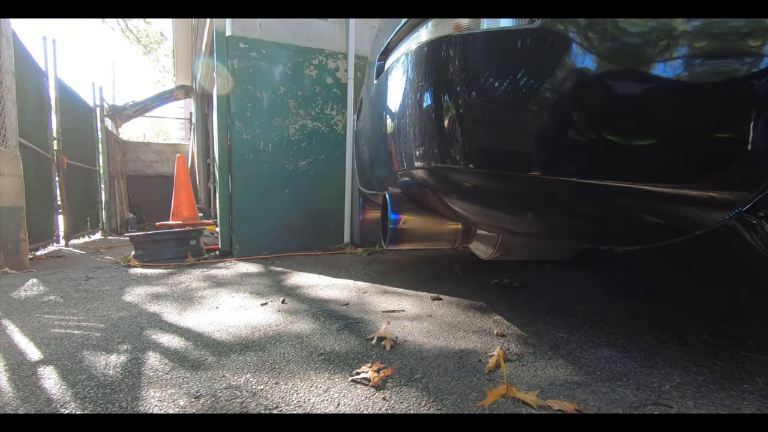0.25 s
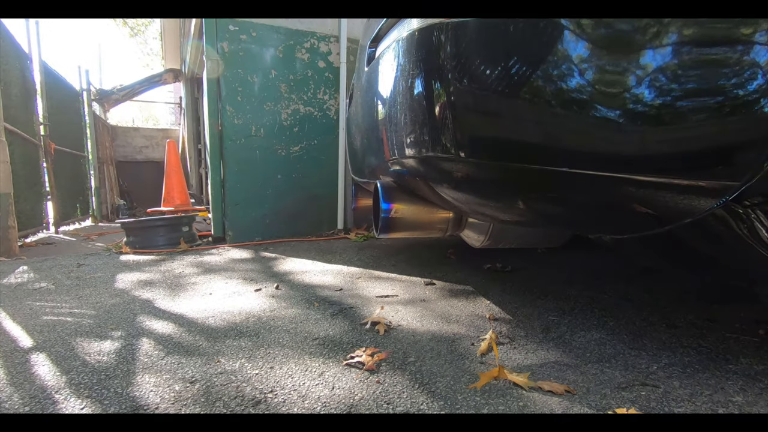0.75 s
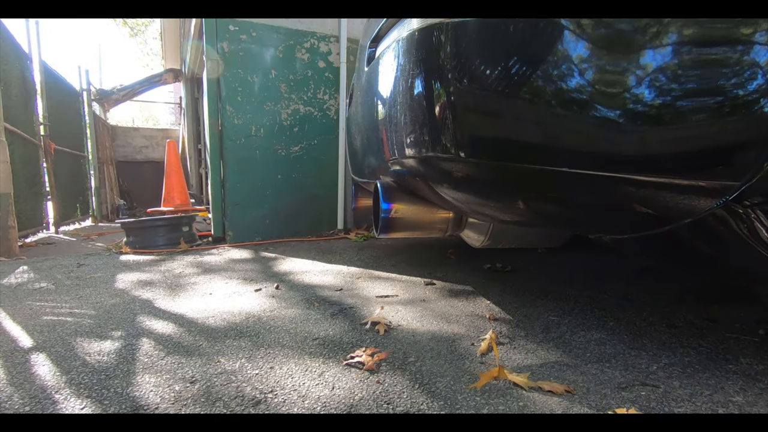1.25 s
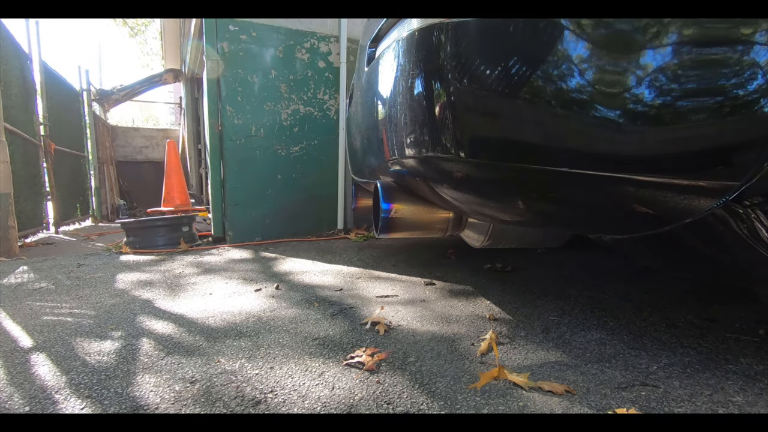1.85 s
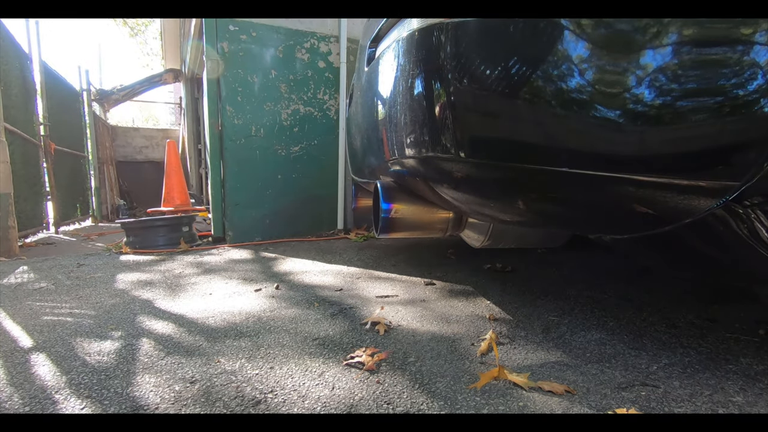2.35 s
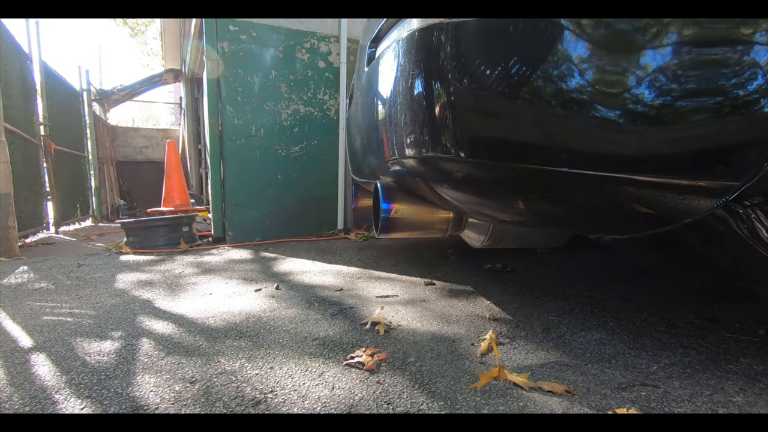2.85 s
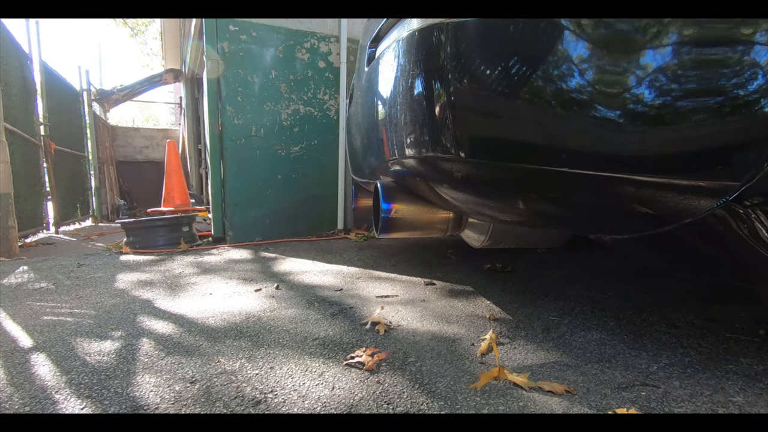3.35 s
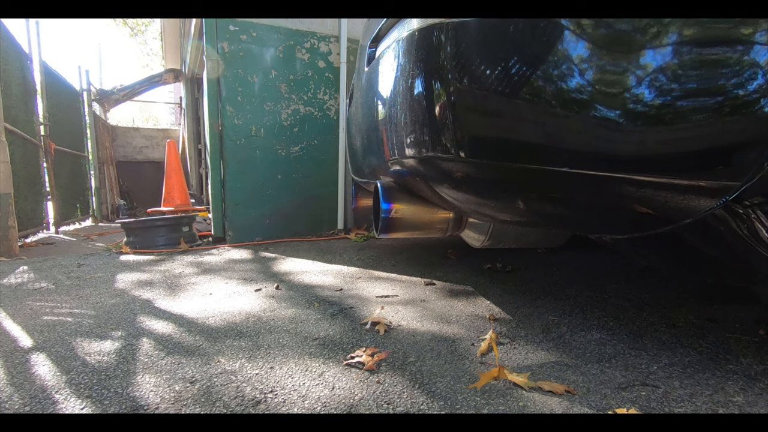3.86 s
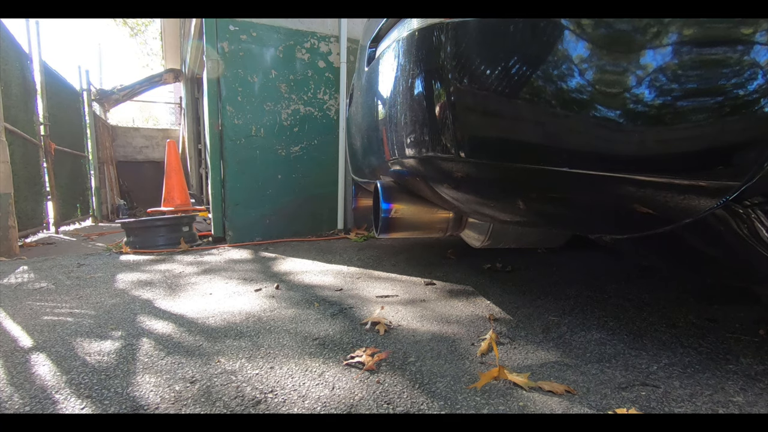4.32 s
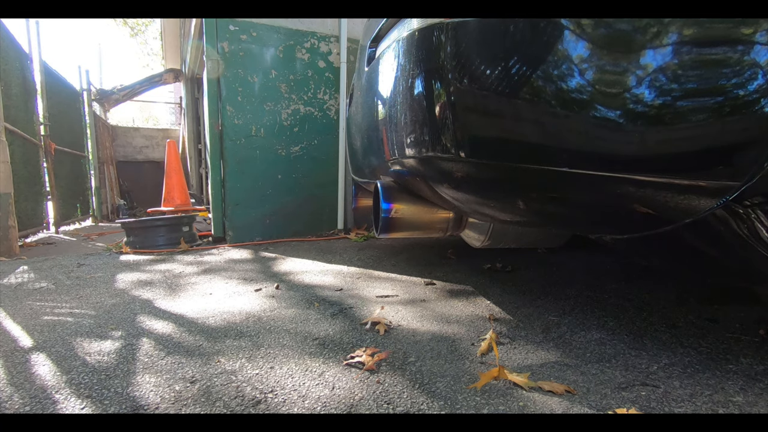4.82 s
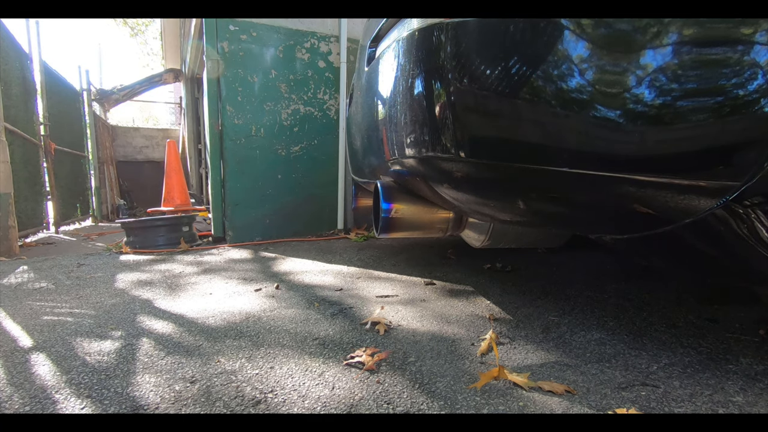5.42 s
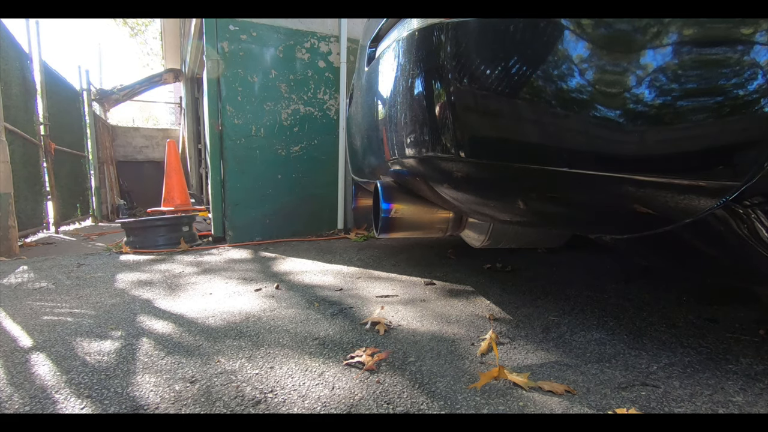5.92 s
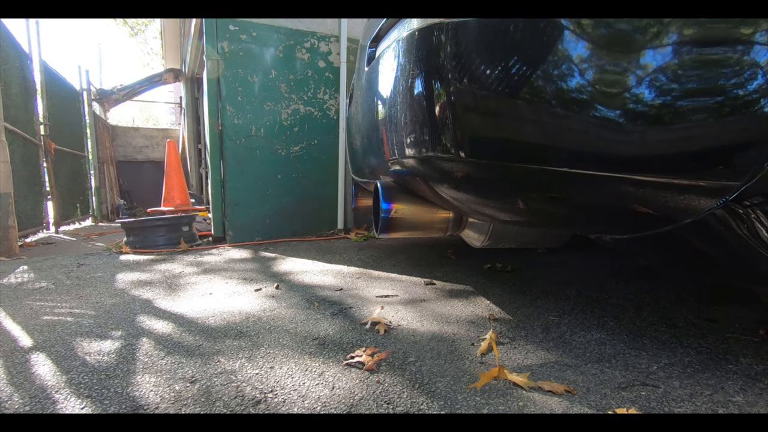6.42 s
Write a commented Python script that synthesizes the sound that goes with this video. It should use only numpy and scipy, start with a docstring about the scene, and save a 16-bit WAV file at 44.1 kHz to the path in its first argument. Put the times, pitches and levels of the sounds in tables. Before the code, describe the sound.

For the first two and a half seconds there is only a low, wavering outdoor rumble and a soft hush, which widens into a stereo hiss with a faint tick at about 0.8 seconds. At 2.5 seconds a car's starter clacks in and grinds through a few compressions, with metallic knocks and low puffs of air from the tailpipe. At about 3.3 seconds the cold V8 catches and flares in a short, loud burst with rough barks and a bright rasp. By 4 seconds it settles into a loud, deep, lumpy idle, heard from the ground near the exhaust. Gas hisses in pulses, the engine bay whirs faintly, and a dry mechanical rasp swells and fades around 4.5 seconds. Very short, rough, rising notes dot the idle, which continues until the end at about 6.6 seconds.

```python
"""A low rumble in a fenced yard; background hush turns to hiss as the recorder opens from mono to stereo.
A starter clacks in and grinds through a few compressions; the cold V8 catches and flares.
It settles into a lumpy idle, heard from the ground near the tailpipe: uneven firings ring the exhaust,
gas hisses and the engine bay whirs once a cycle. Short, rough, rising notes sound over the idle."""
import sys
import numpy as np
from scipy import signal
from scipy.fft import rfft, irfft, next_fast_len
from scipy.io import wavfile
from scipy.ndimage import uniform_filter1d

SR = 44100
rng = np.random.default_rng(int(sys.argv[2]) if len(sys.argv) > 2 else 0)


def file_out(sig):
    """Save sig as 16-bit WAV at sys.argv[1]."""
    # one column per channel
    cols = np.atleast_2d(sig).T
    # limit, then scale
    lim = np.clip(cols, -1, 1)
    pcm = np.round(lim * 32767).astype(np.int16)
    wavfile.write(sys.argv[1], SR, pcm)


N = 294588
TIME = np.arange(N) / SR
FFT_SIZE = next_fast_len(N + SR)
FREQ_HZ = np.maximum(np.arange(FFT_SIZE // 2 + 1) * SR / FFT_SIZE, 1e-3)
COMMON = np.array([[1], [0], [0]])  # selects the row of noise() that both channels share

# noise spectra: (frequency [Hz], gain [dB])
RUMBLE_SPECTRUM = [(15, -30), (30, -8), (48, -15.5), (59, 4.5), (70, -2), (115, -3.5), (150, -8.5),
                   (220, -16.5), (400, -22.5), (900, -57), (6000, -110)]
HUSH_SPECTRUM = [(150, -14), (250, -1.5), (378, -14), (770, -9.5), (1200, -13), (1640, -15), (3010, -29.5),
                 (4480, -26.5), (8600, -52.5), (11200, -94), (18900, -120)]
HISS_SPECTRUM = [(210, -21), (400, -9.5), (700, -5.5), (1120, -3), (1630, -5.5), (3370, -17.5), (4770, -28),
                 (6320, -25.5), (7620, -34.5), (8600, -45.5), (11000, -53), (13000, -67), (16000, -79)]
GRIND_SPECTRUM = [(120, -20), (220, 10.5), (400, -2.5), (700, 3), (1200, 3.5), (2000, 1.5), (2500, 0.5),
                  (3400, -4), (4000, -25), (5000, -15.5), (6400, -6), (7700, -21.5), (8500, -33),
                  (15000, -50)]
GAS_SPECTRUM = [(300, 9.5), (600, -2), (1000, -1), (1700, 1), (2100, -1), (2800, -1.5), (3600, -7.5),
                (4100, -14.5), (4900, -13), (6400, -5.5), (7600, -13.5), (8200, -22), (11000, -25),
                (15000, -43)]
# engine bay stereo balance: (frequency [Hz], left minus right [dB])
BAY_PAN = [(200, -1.5), (500, -6), (950, -7.5), (1600, -7), (2750, -6), (4700, -2.5), (8000, 0)]
# starter load at each compression:
# (time [s], rise [s], length [s], relative grind [dB], gear mesh [Hz], relative hum [dB])
STARTER_STROKES = [(2.483, 0.012, 0.076, -34, 247, -45), (2.542, 0.01, .15, -36.5, 186.7, -31),
                   (2.69, 0.05, 0.13, -29, 234, -25.5), (2.916, 0.0024, 0.085, -31, 230, -32),
                   (3.059, 0.014, 0.076, -30, 244, -37.5), (3.203, 0.0025, 0.073, -31.5, 240, -34.5)]
# starter and bell housing modes: (frequency [Hz], width [Hz], gain [dB])
HOUSING_MODES = [(490, 30, -1), (580, 30, -4), (957, 40, -4), (1136, 25, -5), (1302, 45, 2), (1500, 30, -6),
                 (1792, 25, -2), (1850, 22, -2), (1920, 45, 4), (2089, 18, -3), (2312, 30, -4),
                 (2733, 25, -5), (2942, 18, -5), (3220, 35, -7), (3490, 35, -9), (4020, 40, -17)]
# gear mesh harmonics: (multiple, relative level [dB])
MESH_HARMONICS = [(4, -12), (5, -11), (8, -7)]
# starter gear clacks: (time [s], relative level [dB])
GEAR_CLACKS = [(2.493, -24.5), (2.525, -22.5), (2.915, -23.5), (3.065, -25.5), (3.206, -23.5)]
# unfired air leaving the tailpipe: (time [s], peak [dB])
AIR_PUFFS = [(2.62, -21), (2.838, -18), (2.996, -14), (3.135, -18.5), (3.272, -12.5)]
# cylinders in firing order: (lag [firing intervals], strength [dB], turbulence [dB], cold offset [dB])
V8_CYLINDERS = [(-.08, -4, 2, 7), (-.12, 2.5, 0, -13), (.02, 0, 2, -1), (.38, -3, -1, -11),
                (-.05, 2.5, -6, -18), (-.17, -16, -1, 0), (-.155, 2, -6, 6), (-.175, 5.3, -9, -5.5)]
# exhaust modes: (frequency [Hz], width [Hz], gain [dB], polarity [+/-1])
PIPE_MODES = [(28, 9, -18, -1), (43.5, 39, -13.7, 1), (63.5, 18, -8.8, -1), (94, 45, -3.5, 1),
              (101, 14.5, .7, -1), (123, 22, -13, -1), (174, 16, -14.3, -1), (227, 20, -21.5, -1),
              (328, 22, -34, -1), (400, 22, -38, -1)]
# upper pipe modes stirred by turbulence: (frequency [Hz], width [Hz], gain [dB])
BURBLE_MODES = [(125, 25, 0), (198, 45, 4), (324, 24, 5.5), (390, 30, 0), (450, 35, -6), (535, 20, -8)]
# brief dips in the exhaust level: (time [s], half length [s], gain [dB])
EXHAUST_DIPS = [(3.6, 0.018, -24), (4.393, 0.0048, -11), (4.522, 0.013, -11.5)]
# barks of hard firings: (time [s], half length [s], level [dB])
EXHAUST_BARKS = [(3.452, 0.012, -21), (3.482, .014, -16), (3.52, 0.025, -30), (3.648, 0.016, -28.5),
                 (5.188, 0.0062, -26.5), (5.555, 0.0076, -29)]
# short rising notes over the idle: (time [s], half length [s], pitch [Hz], level [dB])
RISING_NOTES = [(3.908, .022, 433, -29), (4.636, 0.017, 430, -32.5), (5.091, 0.02, 399, -28),
                (5.384, 0.027, 434, -32.5), (5.461, 0.011, 400, -30), (5.826, 0.016, 434, -29),
                (6.188, 0.013, 412, -29), (6.545, .014, 411, -27)]

STEREO_FROM_S = .782
CATCH_S, FLARE_S, EFFORT_FALL_S = 3.32, 3.49, .15
LOPE_S, SETTLE_S = 3.461, .045  # the uneven idle sets in
WARM_S, WARMING_S = 3.94, .05  # the cold offsets fade
SKIP_S, SKIP_CYCLES = 4.39, .24  # the rhythm jumps ahead once


def undb(db):
    """Decibels to gain."""
    return 10 ** (np.asarray(db) / 20)


def unit(x):
    """Scale to rms 1."""
    return x / np.sqrt(np.mean(x ** 2))


def noise():
    """Wide white noise; rows: common, left only, right only."""
    return rng.standard_normal((3, N))


def walk(rate_hz):
    """Smooth random wander, spread near 1."""
    hold = int(SR / rate_hz)
    steps = np.repeat(rng.standard_normal(N // hold + 1), hold)
    return 1.3 * uniform_filter1d(uniform_filter1d(steps, hold), hold)[:N]


def ramp(start_s, length_s):
    """Linear rise from 0 to 1."""
    return np.clip((TIME - start_s) / length_s, 0, 1)


def bump(centre_s, half_s):
    """Gaussian of height 1."""
    return np.exp(-((TIME - centre_s) / half_s) ** 2)


def swell(start_s, rise_s, length_s, fall_s):
    """Linear rise, hold, exponential fall."""
    return ramp(start_s, rise_s) * np.exp(-np.maximum(TIME - start_s - length_s, 0) / fall_s)


def through(x, response):
    """Filter by a frequency response."""
    return irfft(rfft(x, FFT_SIZE) * response, FFT_SIZE)[..., :N]


def band(response):
    """Filtered wide noise, rms 1."""
    return unit(through(noise(), response))


def colour(points):
    """Response through (frequency [Hz], gain [dB]) points."""
    hz, db = np.transpose(points)
    return undb(np.interp(np.log(FREQ_HZ), np.log(hz), db))


def resonance(hz, width_hz):
    """One mode, gain 1 at its centre."""
    return 1 / (1 + 1j * (FREQ_HZ ** 2 - hz ** 2) / (FREQ_HZ * width_hz))


def modes(table):
    """Sum of (frequency [Hz], width [Hz], gain [dB]) modes."""
    return sum(undb(db) * resonance(hz, width_hz) for hz, width_hz, db in table)


def pan(x, left_db):
    """Place by left minus right level."""
    return x * undb(np.array([[left_db], [-left_db]]) / 2)


def from_bay(x, scatter_db=0, left_lag_s=.0002373):
    """Sound from under the car arrives right first; body and fence scatter it from all sides."""
    direct = through(x[0], np.exp(-2j * np.pi * FREQ_HZ * np.array([[left_lag_s], [0]])))
    # ground to floor pan echoes: a fine comb
    echoes = rng.standard_normal((2, SR // 4)) * np.exp(-TIME[:SR // 4] / .025)
    comb = 1 + undb(-9) * rfft(echoes / np.linalg.norm(echoes, axis=1, keepdims=True), FFT_SIZE)
    balance = colour(BAY_PAN) ** np.array([[.5], [-.5]])
    return through(direct + undb(scatter_db) * x[1:], comb * balance)


def background():
    """Wavering rumble, brief rustle; hush turns to hiss as the recorder opens from mono to stereo."""
    rumble = unit(through(noise()[0], colour(RUMBLE_SPECTRUM)))
    rumble_db = -36 + 7.5 * ramp(.37, .048) + 1.14 * walk(8.86)
    rumble *= undb(rumble_db) * swell(-1, 1, 5.4, .071)
    opened = ramp(STEREO_FROM_S, .005)
    hush = band(colour(HUSH_SPECTRUM)) * undb(-43 + 3.6 * np.minimum(TIME, 1)) * (1 - opened)
    hiss = band(colour(HISS_SPECTRUM)) * undb(-39 + .5 * walk(2.42))
    hiss *= opened * swell(-.61, 1, 3.6, .072)
    rustle = band(resonance(5470, 1800) ** 4) * undb(-58) * swell(.12, .036, .19, .14)
    floor = hush + hiss + rustle
    return pan(rumble, 3.1) + pan(undb(-2) * floor[0] + undb(1) * floor[1:], .37)


def starter(sag_per_s=1.3):
    """The pinion slams in, grinds harder at each compression, then spins free with a thin ring."""
    grind = undb(-35.5) * swell(2.495, .01, .83, .06)
    hum = teeth = whine = 0
    for start_s, rise_s, length_s, grind_db, mesh_hz, hum_db in STARTER_STROKES:
        # teeth bite hardest at load onset; the motor slows as the piston rises
        push = swell(start_s, rise_s, length_s, .013) + .4 * swell(start_s, rise_s, .005, .02)
        sag = np.exp(-sag_per_s * np.clip(TIME - start_s - length_s / 2, -length_s, length_s))
        tooth = np.cumsum(mesh_hz * sag * (1 + .02 * walk(120))) / SR
        mesh_rad = 2 * np.pi * tooth
        impacts = np.diff(np.floor(tooth), prepend=0)
        grind += undb(grind_db - 3.5) * push * (1 + .5 * np.cos(mesh_rad))
        teeth += undb(grind_db) * push * unit(impacts * undb(2 * walk(250)))
        hum += undb(hum_db + 3 + 3.9 * walk(90)) * push * np.sin(mesh_rad)
        whine += push * sum(undb(grind_db + db + 3) * np.sin(k * mesh_rad) for k, db in MESH_HARMONICS)
    scrape = unit(noise() * undb(.78 * walk(250)))
    housing = modes(HOUSING_MODES) * colour([(4200, 2), (8000, -15), (15000, -42)])
    body = colour(GRIND_SPECTRUM) + undb(5) * housing
    body /= np.sqrt(np.mean(abs(body) ** 2))
    metal = through(scrape * grind + teeth * COMMON, body) * undb(-.5)
    slam = band(colour([(1500, 1), (3000, 1.5), (7700, 4.5), (8600, -11), (15000, -29)]))
    slam *= undb(-34) * swell(2.494, .003, .045, .025)
    ring = band(resonance(4070, 90) ** 2) * undb(-52) * swell(3.4, .1, .27, .02)
    pinion = band(colour([(1500, -12), (3000, 5.5), (4700, -9), (6400, -3), (8500, -16), (15000, -36)]))
    pinion *= undb(-40.5) * swell(2.495, .0091, .94, .037)
    return from_bay(metal + slam + ring + pinion + whine * COMMON) + pan(hum, 1)


def clacks():
    """Slack in the starter gears closes with short metal clacks."""
    blows = sum(undb(db) * swell(s, .00074, .0016, fall_s=.035) for s, db in GEAR_CLACKS)
    ring = band(resonance(1330, 560) + undb(-7) * resonance(2000, 1200) ** 2)
    tone = colour([(300, -4.5), (800, -3.5), (4000, -1.5), (8000, -18), (12000, -20)])
    return from_bay(through(ring * blows, tone), scatter_db=-4)


def compressions():
    """Unfired air murmurs in the pipe during cranking and puffs after each compression."""
    pipe = resonance(64, 30) * colour([(100, 1), (400, -24.5), (2000, -80)])
    impulse = np.diff(ramp(0, 1 / SR), prepend=0)
    kicks = sum(undb(db) * (np.arange(N) == int(s * SR)) for s, db in AIR_PUFFS)
    puffs = through(kicks, -pipe) / abs(through(impulse, pipe)).max()
    murmur = unit(through(noise()[0], pipe + .24 * resonance(274, 120) ** 2))
    murmur *= undb(-29.5) * swell(2.52, .033, .66, .03)
    return pan(puffs + murmur, 3.7)


def engine_cycles(stumble_hz=5.35, idle_hz=8.21, hunt_period_s=2.284):
    """Four-stroke cycle count: stumble, climb, misfire sag, overshoot, slow hunting."""
    misfire_hz = .55 * bump(3.598, .04)
    overshoot_hz = .37 * bump(3.78, .15)
    hunt_hz = .133 * np.cos(2 * np.pi * (TIME - 5.855) / hunt_period_s)
    running_hz = idle_hz - misfire_hz + overshoot_hz + hunt_hz
    speed_hz = stumble_hz + ramp(3.416, .101) * (running_hz - stumble_hz)
    cycle = np.cumsum(speed_hz) / SR + SKIP_CYCLES * (TIME > SKIP_S)
    return cycle - np.interp(5.319, TIME, cycle)  # zero marks the first cylinder


def firings(cycle, strength_db, scatter_db, cold_db, jitter_s=.00022):
    """One impulse per firing; cylinders differ in lag and strength, and some misfire while cold."""
    lag, count = np.array(V8_CYLINDERS)[:, 0], len(V8_CYLINDERS)
    firing = np.arange(int(cycle[0] * count), int(cycle[-1] * count) + 1)
    cylinder = firing % count
    jitter, scatter = rng.standard_normal((len(firing), 2)).T
    due_s = np.interp(firing / count, cycle, TIME)
    uneven = np.interp(due_s, [LOPE_S, LOPE_S + SETTLE_S], [.15, 1])
    cold = np.interp(due_s, [WARM_S, WARM_S + WARMING_S], [1, 0])
    level_db = uneven * (strength_db[cylinder] + cold * cold_db[cylinder]) + scatter_db * scatter
    when_s = np.interp((firing + uneven * lag[cylinder]) / count, cycle, TIME)
    fires = (when_s > CATCH_S) & (abs(when_s - SKIP_S) > 1 / SR) & (when_s < TIME[-1])
    index = np.clip((when_s + jitter_s * jitter) * SR, 0, N - 1).astype(int)
    return np.bincount(index, fires * undb(level_db), N)


def whir(cycle, puffs, base_hz=1300, fade_db=7, peak_s=4.95, ease_db_per_s=2.5):
    """A ring in the bay: jumps up, bends in pitch and fades once a cycle, chattering three times."""
    turn = uniform_filter1d((cycle - .83) % 1, size=200)
    pitch_hz = base_hz * (1 + .035 * np.sin(np.pi * turn) ** 2 + .017 * walk(55))
    grit = band(colour([(45, 2), (130, -4), (400, -24), (1000, -70)]))
    tone = (.6 * COMMON + .8 * grit) * np.sin(2 * np.pi * np.cumsum(pitch_hz) / SR)
    ring = unit(tone) + undb(-9) * band(resonance(1850, 900) ** 2)
    chatter = undb(-fade_db * turn + 1.1 * np.cos(6 * np.pi * (turn - .07)) + walk(70))
    return unit(ring * chatter * (1 + .14 * puffs)) * undb(-47 - ease_db_per_s * abs(TIME - peak_s))


def bay_rasp(puffs):
    """A dry mechanical rasp swells and fades as the engine settles."""
    tone = colour([(500, -14.5), (850, -2), (1400, 2), (2300, -2), (3000, -9.5), (4000, -25),
                   (9000, -40.5)])
    return unit(through(noise() * (1 + .29 * puffs), tone)) * undb(-46) * bump(4.52, .44)


def gas_hiss(cycle, puffs, level_db):
    """Gas hiss pulses with the firings; a bright rasp marks the leap in speed."""
    flutter = undb(.45 * np.cos(2 * np.pi * (cycle - .25)) + .44 * walk(30))
    hiss = unit(through(noise() * (1 + .082 * puffs) * flutter, colour(GAS_SPECTRUM)))
    rasp = band(colour([(1200, -21), (3000, 9.5), (4700, -12), (6400, 7.5), (8500, -17), (15000, -29)]))
    return hiss * undb(level_db) + rasp * undb(-35) * bump(3.435, .055)


def rising_notes(rise_hz_per_s=1500):
    """Short, rough, rising notes near 400-430 Hz over the idle."""
    rough = 1 + .5 * walk(160)
    notes = np.zeros(N)
    for time_s, half_s, hz, db in RISING_NOTES:
        near = abs(TIME - time_s) < 3 * half_s
        age_s = TIME[near] - time_s
        turns = hz * age_s + rise_hz_per_s * age_s ** 2 / 2 + rng.random()
        notes[near] += undb(db) * np.exp(-(age_s / half_s) ** 2) * np.sin(2 * np.pi * turns)
    return notes * rough


def barks(puffs):
    """Hard firings blow straight out of the pipe: broad, rough, little ring."""
    turbulence = unit(through(noise()[0], resonance(330, 360)))
    tone = colour([(110, -18), (190, 14), (240, -3.5), (300, -2.5), (480, -4.5), (620, -30.5),
                   (1500, -48), (4000, -75)])
    blast = unit(through(puffs + .5 * turbulence, tone))
    return blast * sum(undb(db) * bump(s, half_s) for s, half_s, db in EXHAUST_BARKS)


def burble(kicks, puffs, muffler):
    """Valve kicks and their turbulence ring the upper pipe modes."""
    stir = .6 * unit(puffs * noise()[0]) + unit(kicks)
    return unit(through(stir, modes(BURBLE_MODES) * muffler))


def boom(pulses, chug, muffler):
    """Firings ring the exhaust; the hard-blowing half of each cycle opens the upper tones."""
    pipe = sum(sign * undb(db) * resonance(hz, width_hz) for hz, width_hz, db, sign in PIPE_MODES)
    ring = unit(through(pulses, pipe * muffler)) * undb(-18.5 + 2.5 * bump(FLARE_S, .17))
    upper = through(ring, colour([(115, -41), (150, -4.5)]))
    return ring + upper * (undb(3.5 * chug - .6) - 1)


def engine():
    """One cycle count drives exhaust and bay; the effort of catching dies away after the flare."""
    _, strength_db, turbulence_db, cold_db = np.transpose(V8_CYLINDERS)
    cycle = engine_cycles()
    pulses = firings(cycle, strength_db, .8, cold_db)
    kicks = firings(cycle + .03, turbulence_db, 1.5, 0 * cold_db)  # valves open just ahead of the boom
    puffs = unit(through(kicks, 1 / (1 + 2j * np.pi * FREQ_HZ * .006)))  # 6 ms decay
    chug = np.tanh(4 * np.cos(2 * np.pi * (cycle - .185))) * ramp(LOPE_S, SETTLE_S)
    age_s = np.maximum(TIME - FLARE_S, 0)
    effort = np.exp(-age_s / EFFORT_FALL_S)
    muffler = colour([(20, 6.5), (480, 1), (620, -21), (1000, -29.5), (3000, -58)])
    burble_db = -38.5 + 6 * effort + .5 * age_s + 2.6 * chug
    exhaust = boom(pulses, chug, muffler) + burble(kicks, puffs, muffler) * undb(burble_db)
    gas = gas_hiss(cycle, puffs, level_db=-40.5 + 9.5 * effort - .72 * age_s)
    lows = exhaust + barks(puffs) + rising_notes()
    dips_db = sum(db * bump(s, half_s) for s, half_s, db in EXHAUST_DIPS)
    bay = (gas + whir(cycle, puffs) + bay_rasp(puffs)) * ramp(3.285, .026)
    return pan(lows * undb(dips_db), 3.15) + from_bay(bay)


def scene():
    """Background, cranking and engine, in stereo."""
    return background() + starter() + clacks() + compressions() + engine()


def record(dry, top_hz=15700):
    """The recorder opens from mono to stereo with a faint tick and cuts the top treble."""
    mid = dry.mean(axis=0)
    stereo = mid + (dry - mid) * ramp(STEREO_FROM_S, .01)
    tick = undb(-33) * np.diff(ramp(.786, 1 / SR), prepend=0)
    return signal.sosfilt(signal.ellip(8, .2, 70, top_hz, fs=SR, output="sos"), stereo + tick)


dry = scene()
out = record(dry)
file_out(out)
```